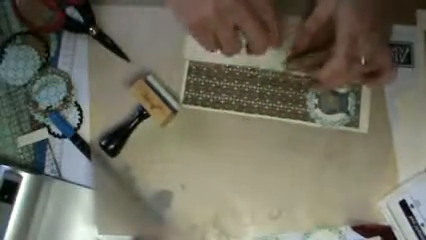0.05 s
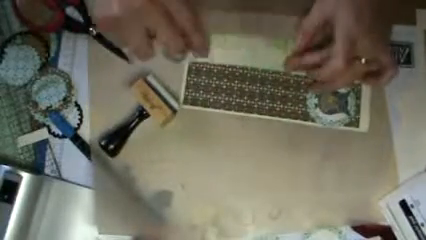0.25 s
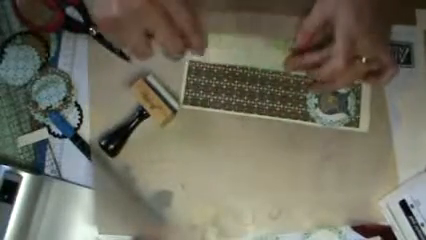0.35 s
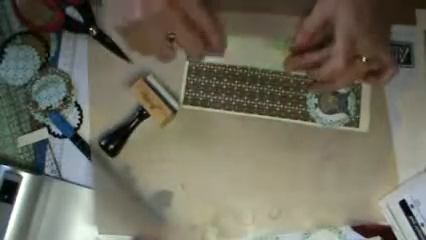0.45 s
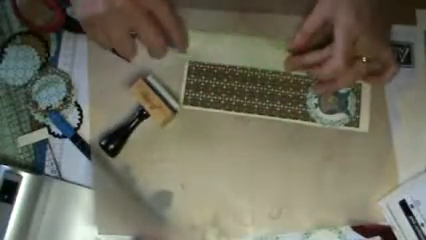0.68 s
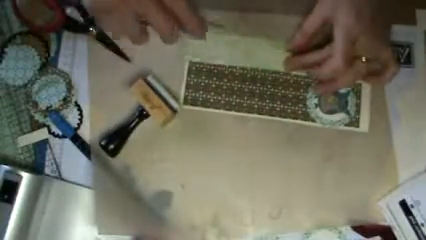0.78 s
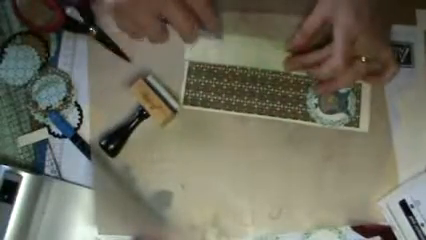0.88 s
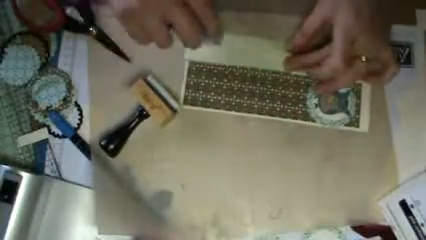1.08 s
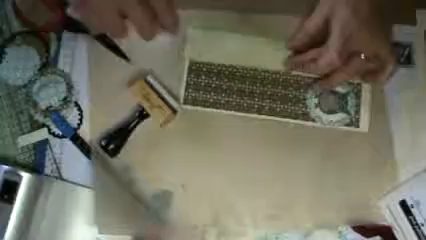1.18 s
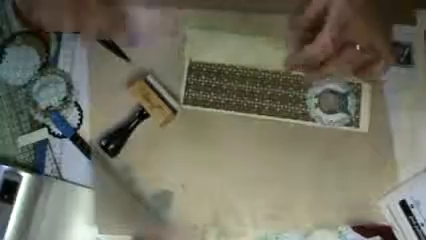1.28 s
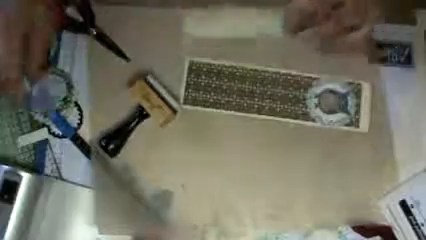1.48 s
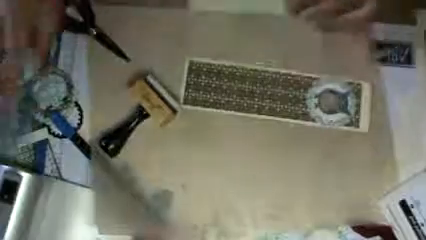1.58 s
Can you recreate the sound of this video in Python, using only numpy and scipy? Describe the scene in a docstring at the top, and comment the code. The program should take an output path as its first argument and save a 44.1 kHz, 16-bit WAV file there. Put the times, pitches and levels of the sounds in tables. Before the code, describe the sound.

Three quick strokes of a plastic adhesive roller on a craft desk, bright clicks crowding together over a gritty drag, dull thumps at landings, then a sharp tick and paper rustle; close microphone, short room tail, faint hiss.

```python
"""A plastic tape runner, close under a camera, is set down on card, drawn three times along it and lifted.
Its pawl clicks over the ratchet teeth ever faster: each click is a burst of damped modes with rebounds.
The roller drags as coloured noise, the desk thumps and rumbles, and small parts tick and ring.
The room adds a short tail; behind it all lie card rustle, a quiet hiss and a thin two-tone motor whine."""
import sys
import numpy as np
from scipy import signal
from scipy.fft import rfft, irfft, next_fast_len
from scipy.io import wavfile
from scipy.ndimage import map_coordinates

SR = 44100
rng = np.random.default_rng(int(sys.argv[2]) if len(sys.argv) > 2 else 0)


def persist_wave(psi):
    """Save psi, clipped to +-1, as 16-bit WAV."""
    counts = np.round(np.clip(psi, -1, 1) * 32767).astype(np.int16)
    wavfile.write(sys.argv[1], SR, np.atleast_2d(counts).T)


N = 72765

# room hiss, middle and sides, shape only: pitch_hz, level_db
HISS_MID = [(15, -54), (25, -16), (91, -0.5), (243, -14), (839, -15), (1010, -11.5), (1370, -14.5),
            (2820, -22.5), (12000, -21.5)]
HISS_SIDE = [(59, -58), (100, -21.5), (845, -0.5), (930, -4), (2580, -6.5), (4500, -23), (5850, -85)]
HISS_MID_DB, HISS_SIDE_DB = -60.5, -61.5  # rms
HISS_MID_LUMPY_DB = .3

# steady tones of the motor: pitch_hz, level_db (rms)
WHINE = [(840, -68), (2520, -77.5)]

# small ticks of plastic and card: start_s, level_db, centre_hz, length_s
TICKS = [(.1225, -47, 4370, 0.0086), (0.1322, -39, 2130, 0.0073), (0.193, -51.5, 5500, 0.05),
         (0.6394, -57, 4370, 0.016), (.6983, -41.5, 9300, 0.0043), (.5117, -51, 3500, 0.002),
         (0.9372, -44, 4500, 0.009), (.9492, -38, 8000, .001), (0.985, -47, 7500, 0.003),
         (1.367, -33, 7500, .0008), (1.3436, -33, 6500, .001), (1.3717, -21, 4600, .0007),
         (1.4368, -41, 3200, .003), (1.5275, -43, 6000, .004), (1.531, -39, 2700, .002),
         (1.1716, -39, 5600, 0.0055), (1.1783, -47, 1400, .005), (1.201, -39, 5400, 0.0042)]
TICK_OCTAVES = 1  # spread around the centre

# decay of the room tail: pitch_hz, t60_s
ROOM = [(500, 0.19), (2000, 0.22), (9190, 0.14)]
ROOM_DB, TAIL_SIDE_DB = -6.5, -20
TAIL_SIDE_LOW_HZ, TAIL_SIDE_HIGH_HZ = 2200, 4500  # band-pass of the side part

# blows into the desk top, landings and lifts: start_s, level_db (before the modes' own levels)
THUMPS = [(.123, -28.5), (0.64, -32), (1.175, -29.5), (1.328, -37)]
# modes of the desk top: pitch_hz, level_db, t60_s (before the hand damps them)
DESK = [(71.5, -14.5, 0.19), (111, -6, 0.39), (330, -4.5, 0.026), (730, -4.5, 0.016)]
DESK_DAMPED_S = .052  # the hand's weight stops the ring
# desk top under the rolling weight: start_s, end_s, level_db
RUMBLE = [(.27, 0.33, -57), (0.7, 0.84, -59), (1.217, 1.323, -58)]
# shape of that rumble: pitch_hz, level_db
RUMBLE_COLOUR = [(40, -39), (110, 3), (170, -35)]

# low knocks of the case on the card: start_s, level_db (before the modes' own levels)
KNOCKS = [(0.1342, -18.5), (0.5119, -38.5), (0.6418, -29.5), (0.6458, -34), (0.6526, -30), (0.689, -31.5),
          (0.6967, -31), (1.175, -33.5), (1.204, -31.5)]
KNOCK_TILT_DB = -18  # per octave, over the case modes
# modes of the plastic case: pitch_hz, level_db, t60_s
CASE = [(1090, -12, 0.01), (1305, -3, 0.017), (1490, -9, 0.021), (1925, -7, 0.018), (2960, 8, 0.01),
        (3834, 6, 0.009)]

# drag of the roller, one curve a stroke: time_s, level_db
DRAG = [
    [(.14, -79), (.17, -55.5), (.22, -43), (.27, -41), (.3, -39.5), (.36, -75)],
    [(.66, -71), (.69, -50.5), (.72, -48.5), (.75, -43), (.82, -52), (.87, -90)],
    [(1.18, -73), (1.22, -41.5), (1.27, -35.5), (1.33, -36.5), (1.36, -61), (1.43, -54)],
]
# shape of the drag: pitch_hz, level_db
DRAG_COLOUR = [(150, -25), (300, -14.5), (900, -13.5), (1350, 1.5), (1700, -11), (3000, -5), (7000, -10.5),
               (12000, -8.5)]

# ratchet teeth: start_s, level_db (before the pawl and case levels below)
TEETH = [(0.205, -19.2), (0.218, -16.6), (0.2292, -15.8), (0.2394, -15.5), (0.249, -15.4), (0.2577, -17.0),
         (0.2657, -17.4), (0.2732, -17.4), (0.2805, -17.5), (0.2872, -22.0), (0.2939, -20.7),
         (0.3024, -21.4), (0.7185, -18.9), (0.732, -19.6), (0.7432, -19.4), (0.7534, -18.7),
         (0.7625, -17.6), (0.7711, -17.1), (0.779, -18.0), (0.7873, -18.8), (0.7952, -17.7), (0.803, -20.7),
         (0.8112, -20.8), (1.2189, -19.1), (1.2361, -20.2), (1.2501, -19.9), (1.262, -20.5),
         (1.2717, -18.6), (1.2802, -19.3), (1.2879, -19.9), (1.2949, -20.8), (1.302, -19.9),
         (1.3084, -21.0), (1.3148, -21.2), (1.3214, -21.5)]
# strokes along the card: start_s, rebound_db (added to every rebound)
STROKES = [(0.204, 7), (0.7205, 3.5), (1.217, 2)]
# the pawl bounces after landing: delay_s, level_db (before the stroke's rebound_db)
REBOUNDS = [(.00062, -8), (.0013, -4), (.0021, -10)]
# modes of pawl and gear: pitch_hz, level_db
PAWL = [(4600, -12), (5800, -7), (6750, 0), (7500, 0), (8380, 0), (9900, -9), (11000, -7), (11800, -8)]
PAWL_DB, CASE_DB = -9, -22
CASE_GROWS_DB_PER_S = 87  # the case rings louder as the hand leans into a stroke
REBOUND_JITTER_S, PAWL_T60_S = .00004, .0038

# card rustling under the hands: time_s, level_db
RUSTLE = [(.93, -86), (.95, -50), (.98, -80), (1.02, -83), (1.33, -53.5), (1.38, -49.5), (1.45, -55),
          (1.6, -58), (1.65, -51)]
# shape of the rustle: pitch_hz, level_db
RUSTLE_COLOUR = [(150, -23.5), (270, 0), (500, -16), (1500, -14), (5300, -12), (12000, -18)]

# small parts that ring briefly when tapped: start_s, level_db, pitch_hz, t60_s
PINGS = [(.9405, -41, 3800, .02), (.9438, -32, 5600, .008), (.9493, -27, 5200, .008),
         (1.528, -30, 6400, .014), (1.5417, -35, 560, .012), (1.555, -45, 1100, .03)]

PITCH_SCATTER = .013  # of each mode's pitch, as a fraction
TOP_HZ = 12150  # the camera's band limit


def amp(db):
    """Decibels to a plain gain."""
    return 10 ** (np.asarray(db) / 20)


def unit(x):
    """Scale to rms 1."""
    return x / np.sqrt(np.mean(x ** 2) + 1e-20)


def along(points, hz):
    """Read (pitch_hz, value) points along a log pitch axis."""
    f, v = np.transpose(points)
    return np.interp(np.log(hz + 1), np.log(f + 1), v)


def level(rows):
    """Gain per sample from (time_s, level_db) rows, practically silent outside them."""
    s, db = np.transpose(rows)
    return amp(np.interp(np.arange(N) / SR, s, db, left=-120, right=-120))


def filtered(x, response):
    """Shape the spectrum of x by a response of frequency."""
    m = next_fast_len(x.shape[-1] + 4096)
    spectrum = rfft(x, m) * response(np.fft.rfftfreq(m, 1 / SR))
    return irfft(spectrum, m)[..., :x.shape[-1]]


def noise(colour, lumpy_db, rate):
    """Coloured noise of rms 1 whose level wanders between random values drawn rate times a second."""
    values = rng.standard_normal(int(N * rate / SR) + 4)
    lumps = map_coordinates(values, [np.arange(N) * rate / SR])
    top_hz = 1.05 * np.transpose(colour)[0][-1]
    white = rng.standard_normal(N) * amp(lumpy_db * lumps)
    return unit(filtered(white, lambda hz: amp(along(colour, hz)) * (hz < top_hz)))


def add(x, s, piece):
    """Mix a piece in at time s."""
    i = int(round(s * SR))
    x[i:i + len(piece)] += piece[:len(x) - i]


def ring(modes, attack_s, scatter_db, tilt_db=0):
    """One blow on a body: decaying sines, each mode at a new level and a slightly new pitch."""
    hz, db, t60 = np.transpose(modes)[:, :, None]
    r = rng.standard_normal((len(modes), 2))
    t = np.arange(int(np.max(t60) * SR)) / SR
    tilt = tilt_db * np.log2(hz / hz[0])
    gain = amp(db + tilt + scatter_db * r[:, :1] - 60 * t / t60)
    pitch = hz * (1 + PITCH_SCATTER * r[:, 1:])
    return (gain * np.sin(2 * np.pi * pitch * t)).sum(0) * (1 - np.exp(-t / attack_s))


def hiss():
    """The quiet room as two independent coloured noises, for the middle and the sides."""
    mid = amp(HISS_MID_DB) * noise(HISS_MID, lumpy_db=HISS_MID_LUMPY_DB, rate=14.0)
    side = amp(HISS_SIDE_DB) * noise(HISS_SIDE, lumpy_db=1, rate=20)
    return mid, side


def whine():
    """The motor holds steady sine tones."""
    t = np.arange(N) / SR
    return sum(np.sqrt(2) * amp(db) * np.sin(2 * np.pi * hz * t) for hz, db in WHINE)


def ticks():
    """Short decaying snaps of noise around a centre pitch."""
    x = np.zeros(N)
    t = np.arange(2048) / SR
    lead_s = .001  # silence ahead of the snap, room for the filter's spread
    for s, db, centre_hz, length in TICKS:
        decay = np.exp(-1.5 * (t - lead_s).clip(0) / length) * (t > lead_s)
        snap = rng.standard_normal(len(t)) * decay
        snap = filtered(snap, lambda hz: np.exp(-.5 * (np.log2((hz + 1) / centre_hz) / TICK_OCTAVES) ** 2))
        snap = snap / np.linalg.norm(snap) * np.sqrt(length * SR)  # energy of rms 1 over its length
        add(x, s - lead_s, amp(db) * snap)
    return x


def room_tail(x):
    """Short decaying noise tail, drawn anew every 1024 samples; the side part is band-passed, faint and narrow."""
    out, step = np.zeros((2, N + SR)), 1024
    delay = 90  # samples, about 2 ms
    for i in range(0, N, step):
        hz, t, z = signal.stft(rng.standard_normal((2, SR // 4)), SR, nperseg=128)
        decay = amp(-60 * t / along(ROOM, hz)[:, None])
        tail = signal.istft(z * decay, SR, nperseg=128)[1]
        wet = signal.fftconvolve(x[None, i:i + step], tail / np.linalg.norm(tail[0]), axes=1)
        out[:, i + delay:i + delay + wet.shape[1]] += wet
    side = filtered(out[1, :N], lambda hz: (hz > TAIL_SIDE_LOW_HZ) * (hz < TAIL_SIDE_HIGH_HZ))
    return amp(ROOM_DB) * out[0, :N], amp(TAIL_SIDE_DB) * side


def desk():
    """The desk top booms in damped modes at each landing and lift, and rumbles as the roller runs."""
    x = np.zeros(N)
    for s, db in THUMPS:
        boom = ring(DESK, attack_s=.003, scatter_db=1)
        damping = np.exp(-(np.arange(len(boom)) / SR / DESK_DAMPED_S) ** 4)
        add(x, s, -amp(db) * boom * damping)
    fade_s = .02
    rolling = sum(level([(a - fade_s, -80), (a, db), (b, db), (b + fade_s, -80)]) for a, b, db in RUMBLE)
    return x + rolling * noise(RUMBLE_COLOUR, lumpy_db=1, rate=20)


def knocks():
    """Soft blows on the case wake mostly its low modes."""
    x = np.zeros(N)
    for s, db in KNOCKS:
        add(x, s, amp(db) * ring(CASE, attack_s=0.0003, scatter_db=3, tilt_db=KNOCK_TILT_DB))
    return x


def drag():
    """The roller grinds the tape onto the card: rough noise that swells and fades with each stroke."""
    return sum(level(curve) for curve in DRAG) * noise(DRAG_COLOUR, lumpy_db=4, rate=300)


def ratchet():
    """Each tooth lets the pawl land and rebound; the case rings from the nominal first rebound on."""
    x = np.zeros(N)
    modes = [(hz, db, PAWL_T60_S) for hz, db in PAWL]
    for s, db in TEETH:
        # time from the nearest stroke start, and that stroke's rebound strength
        since, rebound_db = min((abs(s - start), r) for start, r in STROKES)
        click = np.zeros(SR // 100)
        impacts = [(0.00012, 0)] + [(delay, loss + rebound_db) for delay, loss in REBOUNDS]
        for delay, impact_db in impacts:
            jittered = abs(delay + REBOUND_JITTER_S * rng.standard_normal())
            add(click, jittered, amp(impact_db) * ring(modes, attack_s=0.0001, scatter_db=3))
        add(x, s, amp(db + PAWL_DB) * unit(click))
        case_db = db + CASE_DB + CASE_GROWS_DB_PER_S * since
        add(x, s + REBOUNDS[0][0], amp(case_db) * ring(CASE, attack_s=0.00025, scatter_db=2.5))
    return x


def rustle():
    """Card rustles under the hands: coloured noise with a restless level."""
    return level(RUSTLE) * noise(RUSTLE_COLOUR, lumpy_db=2.0, rate=160)


def pings():
    """A tapped small part gives one damped tone."""
    x = np.zeros(N)
    for s, db, hz, t60 in PINGS:
        add(x, s, amp(db) * ring([(hz, 0, t60)], attack_s=.0004, scatter_db=1))
    return x


def scene():
    """Close sources feed the room tail; desk, rustle, whine and hiss stay without it."""
    near = ticks() + knocks() + drag() + ratchet() + pings()
    tail_mid, tail_side = room_tail(near)
    hiss_mid, hiss_side = hiss()
    mid = near + tail_mid + desk() + rustle() + whine() + hiss_mid
    side = tail_side + hiss_side
    return np.array([mid + side, mid - side])


def record(dry):
    """The camera cuts steeply above its band limit."""
    return filtered(dry, lambda hz: 1 / (1 + (hz / TOP_HZ) ** 140))


dry = scene()
out = record(dry)
persist_wave(out)
```